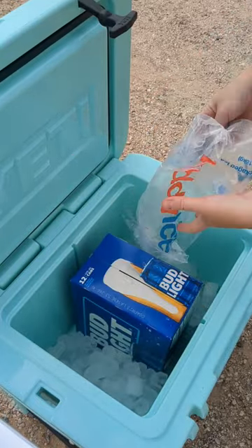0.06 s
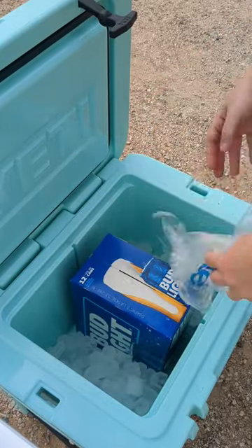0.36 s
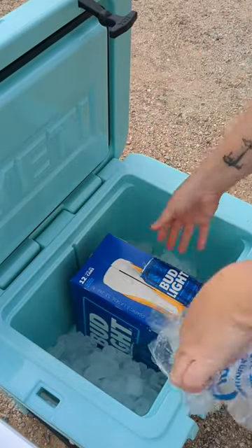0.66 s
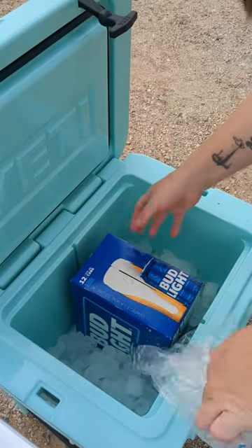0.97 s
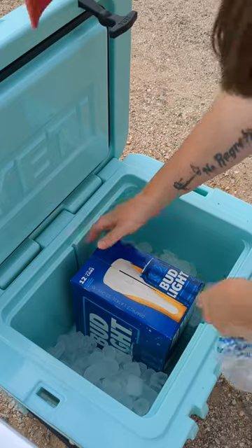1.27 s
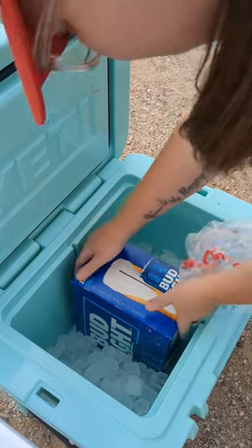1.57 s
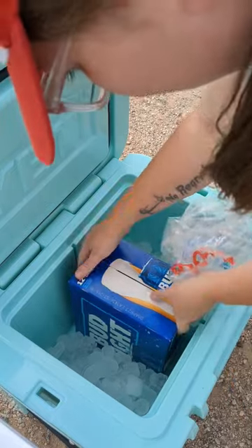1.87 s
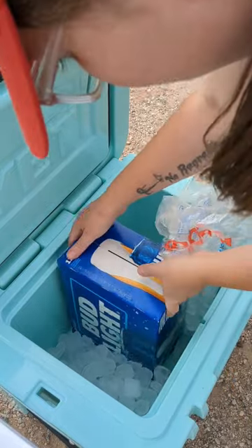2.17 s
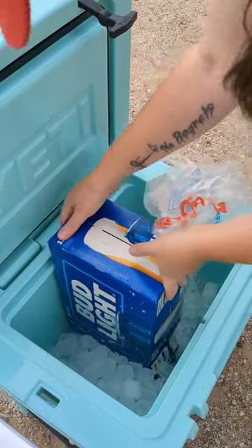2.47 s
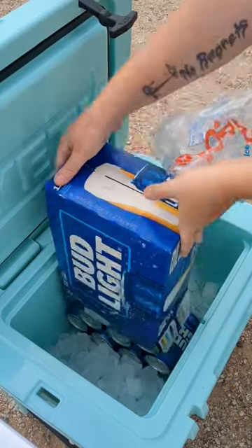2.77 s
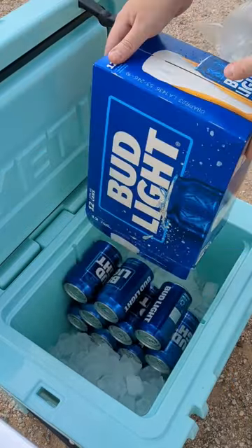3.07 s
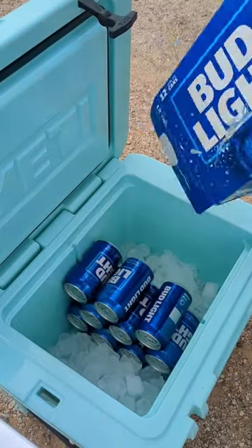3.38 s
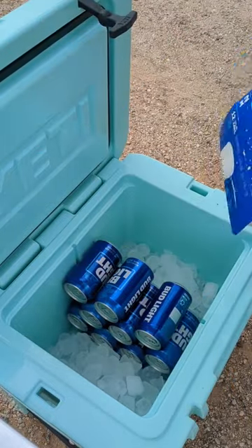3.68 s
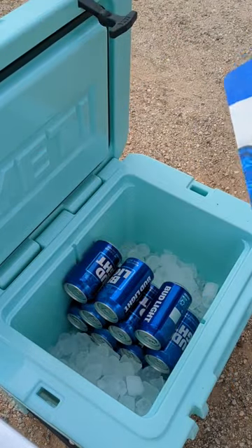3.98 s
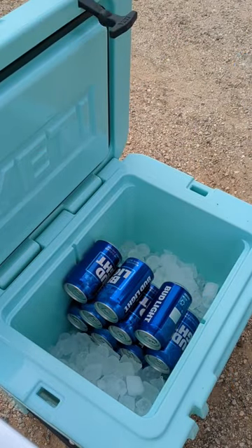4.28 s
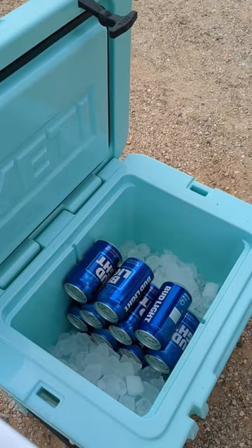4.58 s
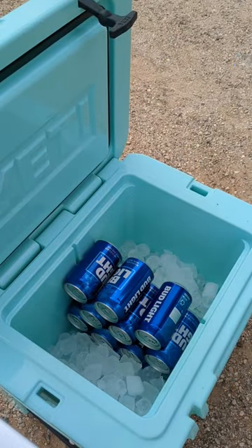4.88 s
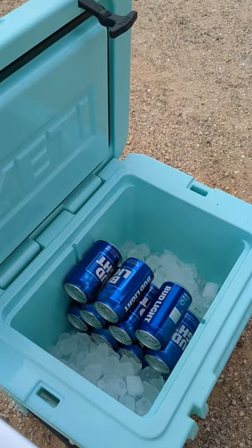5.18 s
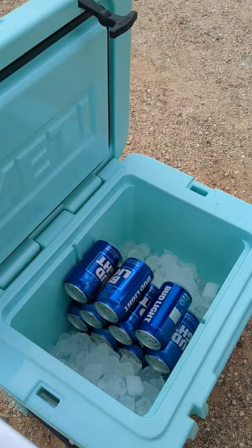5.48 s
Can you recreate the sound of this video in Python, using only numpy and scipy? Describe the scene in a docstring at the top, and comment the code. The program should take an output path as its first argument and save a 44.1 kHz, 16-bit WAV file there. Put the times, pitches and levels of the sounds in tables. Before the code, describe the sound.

A single ice cube clicks into a plastic cooler while a thin bag crackles nearby, then dies down. Next comes the loudest part: cans scrape out of a lifted carton and tumble onto crunching ice with hollow thuds. The bag and carton are carried away with light crinkles and gritty scuffs. The microphone is close, in a quiet outdoor spot where far-off machines faintly hum and whine.

```python
"""An emptied ice bag crinkles close to the microphone, outdoors over a hard plastic cooler,
its creases buckling in tiny clicks; one last cube drops in. A carton is lifted and its drink cans
slide out, rubbing the cardboard, knocking onto the ice and ringing the tub. Bag and carton are
carried off over gravel with a few scuffs, while faint machines hum and whine far away."""
import sys
import numpy as np
from scipy import signal
from scipy.fft import rfft, irfft
from scipy.io import wavfile

SR = 44100
rng = np.random.default_rng(int(sys.argv[2]) if len(sys.argv) > 2 else 0)


def store_pcm(level_fs):
    """Save levels as 16-bit WAV."""
    pcm = np.round(np.clip(level_fs, -1, 1) * 32767).astype(np.int16)
    wavfile.write(sys.argv[1], SR, np.atleast_2d(pcm).T)


N = 244314
TIME = np.arange(N) / SR
TOP_HZ = 15950

# bright fizz of thin film and ice chips: (frequency [Hz], relative level [dB])
FIZZ_SPECTRUM = [(1500, -41), (4000, -11), (6500, 2.5), (8000, 0), (10000, 4), (12500, 6), (14000, -5),
                 (16000, -5)]
# rustle of the bag's larger folds: (frequency [Hz], relative level [dB])
FOLD_SPECTRUM = [(100, -1), (380, 1.5), (600, -2.5), (950, -0.5), (1200, -4), (1900, -1), (3200, -3),
                 (5000, -6.5), (9000, -30)]
# grips on the bag: (start [s], length [s], fizz [dB], rustle [dB])
BAG_GRIPS = [(0, 0.18, -52.5, -51), (.135, 0.37, -48, -50), (.41, 0.04, -46.5, -46), (.49, .29, -54, -57),
             (.65, 0.064, -50, -61), (.8, 1, -59.5, -60), (1.02, 0.11, -51.5, -51),
             (1.275, 0.084, -49.5, -52), (1.41, 0.12, -60.5, -56), (1.63, 0.044, -62, -58),
             (3.08, 0.22, -73, -74.5), (3.145, 0.022, -63.5, -61.5), (3.32, 1.47, -67, -69.5),
             (3.402, 0.029, -53, -89), (3.49, .05, -63.5, -61), (3.6, 0.15, -71, -62),
             (3.635, 0.013, -54.5, -57.5), (3.795, 0.12, -59, -73), (3.91, 0.053, -57.5, -62),
             (4.02, .055, -53, -57.5), (4.1, 0.05, -56.5, -58.5), (4.39, 0.12, -58.5, -63.5),
             (4.63, 0.033, -62.5, -81), (4.83, 0.062, -64, -61), (4.92, .15, -66.5, -64.5),
             (5.325, 0.053, -70, -63.5), (5.39, 0.18, -72.5, -69)]
# the loudest snaps of film and ice: (time [s], level [dB], lower crack relative to that [dB])
LOUD_SNAPS = [(0.7427, -39, -1), (0.9335, -44.5, -24), (1.0306, -46, -11), (1.5708, -46, -5),
              (1.7578, -43, -3), (1.8104, -49, 3), (1.932, -49, 2), (2.376, -27, 6.5), (2.4012, -30, 2.5),
              (2.435, -28, 6), (2.5206, -33, -4), (2.622, -31, 8), (2.6648, -36.5, -1.5),
              (2.7143, -41.5, 10), (2.7457, -39.5, 11), (2.9265, -29, -8), (2.9817, -37.5, -11),
              (3.0724, -42, 5), (3.2158, -54.5, -7.5), (3.324, -51, -10), (4.0505, -41, -4.5),
              (4.2197, -50.5, -6), (4.352, -49, -6), (4.4525, -46.5, 1.5), (4.783, -52, -13),
              (4.9676, -55, -6), (5.1088, -58.5, -10)]
# cans and carton landing: (time [s], level [dB], pitch [Hz])
LANDINGS = [(2.2405, -1, 503), (2.246, -13.5, 240), (2.2617, -0.5, 554), (2.269, -9, 280),
            (2.374, -7.5, 460), (2.387, -5, 657), (2.4045, -3.5, 810), (2.427, -14.5, 278),
            (2.44, -11, 210), (2.847, 0, 377), (2.8549, -5, 390), (2.8628, -0.5, 316), (2.8782, -1.5, 388),
            (2.888, -7.5, 210), (2.875, -15.5, 150), (2.972, -17.5, 171), (2.969, -7.5, 426)]
# cubes and cans striking together: (time [s], level [dB], pitch [Hz], t60 [s])
ICE_CLACKS = [(0.0881, -12.5, 1890, 0.0062), (2.128, -19, 2200, 0.0043), (2.4014, -21.5, 2010, 0.026),
              (2.434, -22, 2630, 0.015), (2.5384, -18.5, 2710, 0.003), (2.8471, -20.5, 1800, 0.019),
              (2.8917, -18.5, 1870, 0.0056), (2.9627, -21.5, 1410, 0.01), (3.0721, -39, 2720, 0.013)]
# cans rubbing on cardboard: (frequency [Hz], relative level [dB])
RUB_SPECTRUM = [(300, -6.5), (900, -2.5), (1300, -1.5), (2000, -0.5), (2800, -2), (3800, -8), (5000, -13.5),
                (9000, -28.5)]
# the carton's drumming panels: (frequency [Hz], relative level [dB])
PANEL_SPECTRUM = [(60, -62.5), (130, -18.5), (220, -3.5), (400, -0.5), (520, -1), (680, -3.5), (850, -4.5),
                  (1200, -14), (2500, -53)]
# steady drag of the carton lifted off the cans: (time [s], level [dB])
CARTON_DRAG = [(1.799, -62.5), (1.95, -50), (2.05, -49.5), (2.19, -34.5), (2.32, -37.5), (2.5, -44),
               (2.78, -45.5), (3.02, -50), (3.112, -80)]
# cans breaking loose: (start [s], length [s], rub [dB], panel drumming [dB], ice crunch [dB])
CAN_TUMBLES = [(2.106, .03, -41.5, -42, -59), (2.232, 0.04, -38, -29.5, -48.5),
               (2.346, .095, -32, -26.5, -44), (2.612, 0.0065, -36, -29, -48),
               (2.803, 0.091, -33, -27, -41), (2.958, 0.041, -45, -28, -66)]
# resonances of the open tub: (frequency [Hz], gain [dB], t60 [s])
TUB_MODES = [(148.6, -0.5, 1), (198.9, 4.5, 0.17), (271.5, -3.5, 0.26), (394, -0.5, 0.13),
             (638, -10.5, 0.1), (795, -5, 0.082), (955, -15.5, 0.077), (1276, -5, .14)]
# hands, shoes and carton scuffing: (time [s], level [dB], pitch [Hz], t60 [s])
SCUFF_STROKES = [(0, -25, 614, 0.036), (0.027, -40, 417, 0.22), (0.426, -46.5, 280, 0.17),
                 (1.955, -45, 5400, .09), (2.108, -26, 726, 0.2), (3.593, -44, 780, 0.065),
                 (3.743, -40.5, 420, 0.15), (4.256, -54, 540, 0.18), (4.449, -48, 1450, 0.12),
                 (4.609, -49, 805, 0.07), (4.89, -47.5, 1066, 0.16), (5.034, -45.5, 640, 0.18),
                 (5.35, -53, 794, 0.23)]
# thin tones as the carton is carried off: (start [s], length [s], pitch [Hz], level [dB])
FAINT_TONES = [(3.105, 1, 251.6, -61), (3.548, 0.41, 4440, -70), (3.55, 0.95, 2345, -69)]
# a far machine humming: (time [s], level [dB])
MACHINE_HUM = [(0, -53), (1.0, -63.5), (2.0, -54), (3.2, -67.5), (4.2, -63), (5.54, -65)]
# a far motor gathering speed: (time [s], pitch [Hz], level [dB])
MOTOR_WHINE = [(3.602, 698, -78), (4.398, 705, -71.5), (4.9, 731, -65), (5.2, 717.5, -67),
               (5.54, 722, -68.5)]
# the low noise of the open air: (frequency [Hz], relative level [dB])
AIR_SPECTRUM = [(20, -26.5), (35, -13), (55, 5), (85, 1.5), (125, 3.5), (180, -10), (260, -11.5), (380, -5),
                (550, -11), (800, -19), (1100, -25), (3000, -34.5), (6000, -38), (15000, -65)]


def bag(strays_per_s=7):
    """Close up, creases buckle: small ones fizz, a few crackle or snap, larger folds rustle."""
    fizz_gain, folds_gain = np.sqrt(burst_power(BAG_GRIPS, attack_s=0.0095, release_t60=0.097))
    creases = grains(per_s=16000, spread_db=1.5, clump_db=3, clump_hz=147)
    crackle = amp(-5) * pings(per_s=420, low_hz=1202, high_hz=14600, cycles=35, spread_db=2.5)
    folds = grains(per_s=6600, spread_db=4, clump_db=2, clump_hz=95.3)
    stray_times = TIME[rng.random(N) < strays_per_s / SR]
    strays = snaps([(start, 9, -11) for start in stray_times])  # 9 dB over the fizz
    fizz = colour((creases + crackle) * fizz_gain, FIZZ_SPECTRUM) + strays * fizz_gain
    rustle = colour((folds + crackle * amp(-3)) * folds_gain, FOLD_SPECTRUM)
    return fizz + rustle


def snaps(rows, t60=0.022):
    """A crease or a cube gives way in a short bright spray with a lower crack."""
    top_gain, crack_gain, t = np.zeros(N), np.zeros(N), TIME[:SR // 20]
    for start, db, crack_db in rows:
        add(top_gain, start, amp(db) * decay(t, t60))
        add(crack_gain, start, amp(db + crack_db) * decay(t, t60))
    spray = rng.standard_normal(N)
    return colour(spray * top_gain, FIZZ_SPECTRUM) + colour(spray * crack_gain, FOLD_SPECTRUM)


def can_knocks(rise_s=0.00053, ring_cycles=6.4):
    """A full can lands with a heavily damped thud; so small a body radiates little bass."""
    thuds, t = np.zeros(N), TIME[:SR // 8]
    for start, db, hz in LANDINGS:
        envelope = (1 - np.exp(-t / rise_s)) * decay(t, ring_cycles / hz)
        add(thuds, start, amp(db) * envelope * np.sin(2 * np.pi * hz * t))
    return tub_echoes(low_cut(thuds, hz=190), wet_db=-12, t60=0.04)


def ice_clacks(rise_s=0.00077, chirp_s=0.0005):
    """A hard contact cracks, swells for a millisecond and rings briefly, starting sharp in pitch."""
    clacks, t = np.zeros(N), TIME[:SR // 16]
    for start, db, hz, t60 in ICE_CLACKS:
        tone = sine(hz * (1 + 0.5 * np.exp(-t / chirp_s)))
        envelope = (1 - np.exp(-(t / rise_s) ** 2)) * decay(t, t60)
        crack = amp(-17) * colour(rng.choice([-1, 1], len(t)) * decay(t, t60=0.03), RUB_SPECTRUM)
        add(clacks, start, amp(db) * (envelope / envelope.max() * tone + crack))
    return tub_echoes(clacks, wet_db=-3, t60=0.032)


def can_slide():
    """Cans stick and slip along the cardboard, drum on its panels and grind into clattering ice."""
    drag = fader(*np.transpose(CARTON_DRAG)) * amp([0, 6, -8])[:, None]  # rub, drum, crunch
    tumble_power = burst_power(CAN_TUMBLES, attack_s=0.0033, release_t60=0.17)
    rub_gain, drum_gain, crunch_gain = np.sqrt(drag ** 2 + tumble_power)
    slips = grains(per_s=5000, spread_db=4, clump_db=0.5, clump_hz=118)
    clatter = amp(-11) * pings(per_s=500, low_hz=726, high_hz=5850, cycles=34, spread_db=7.5)
    bumps = grains(per_s=2000, spread_db=3.5, clump_db=2.5, clump_hz=65.6)
    chips = grains(per_s=7100, spread_db=4.5, clump_db=3, clump_hz=145)
    rub = colour((slips + clatter) * rub_gain, RUB_SPECTRUM)
    drum = colour(bumps * drum_gain, PANEL_SPECTRUM)
    crunch = colour(chips * crunch_gain, FIZZ_SPECTRUM)
    return tub_echoes(rub + drum + crunch, wet_db=-8, t60=0.035)


def tub_echoes(x, wet_db, t60, count=90, dull_hz=3500):
    """Quick echoes between the walls and the lid; the ice scatters their treble away."""
    delays_s = 0.0015 + (np.arange(count) + rng.random(count)) / 2000
    taps = np.zeros(SR // 16)
    taps[(delays_s * SR).astype(int)] = rng.choice([-1, 1], count) * decay(delays_s, t60)
    dulled = signal.lfilter(*signal.butter(2, dull_hz, fs=SR), taps / np.linalg.norm(taps))
    return x + amp(wet_db) * signal.oaconvolve(x, dulled)[:N]


def tub_ring(x):
    """The tub and the air in it ring on after every blow."""
    ring, t = 0, TIME[:SR // 2]
    for hz, db, t60 in TUB_MODES:
        envelope = decay(t, t60)
        ring += amp(db) * 2 * np.cos(2 * np.pi * hz * t) * envelope / envelope.sum()
    return x + signal.oaconvolve(x, ring)[:N]


def scuffs(rise_s=0.0025):
    """Hands, shoes and carton make short gritty rubs, each around one broad resonance."""
    out, t = np.zeros(N), TIME[:SR // 3]
    grit = grains(per_s=4000, spread_db=2.5, clump_db=1.5, clump_hz=100)
    for start, db, hz, t60 in SCUFF_STROKES:
        band = signal.iirpeak(hz, Q=0.9, fs=SR)
        stroke = np.roll(grit, -round(start * SR))[:len(t)]
        rub = unit_rms(signal.lfilter(*band, signal.lfilter(*band, stroke)))
        add(out, start, amp(db) * rub * (1 - np.exp(-t / rise_s)) * decay(t, t60))
    return out


def faint_tones():
    """Narrow wavering tones swell and fade in the background."""
    out = np.zeros(N)
    for start, length, hz, db in FAINT_TONES:
        swell = np.sin(np.pi * np.clip((TIME - start) / length, 0, 1))
        out += amp(db) * swell * sine(hz * (1 + 0.028 * drift(88)))
    return out


def far_machines(hum_hz=147, upper_ratio=1.095):
    """Far from the microphone, one machine hums unsteadily and a motor whines on two tones."""
    hum_gain = fader(*np.transpose(MACHINE_HUM)) * amp(1.5 * drift(8.3))
    hum = hum_gain * sine(hum_hz + 4 * drift(14.7))
    times, hz, db = np.transpose(MOTOR_WHINE)
    whine_hz = np.interp(TIME, times, hz) + 13 * drift(38.2)
    return hum + fader(times, db) * (sine(whine_hz) + sine(upper_ratio * whine_hz))


def open_air():
    """The bed of the place: low outdoor noise, gently rising and falling."""
    return amp(-58.5) * colour(rng.standard_normal(N), AIR_SPECTRUM) * amp(1.9 * drift(2.4))


def grains(per_s, spread_db, clump_db, clump_hz):
    """Tiny clicks of uneven size that come in clumps, at unit RMS."""
    sizes = amp(spread_db * np.minimum(rng.exponential(1, N), 3))
    clicks = rng.choice([-1, 1], N) * sizes * (rng.random(N) < per_s / SR)
    clumping = amp(2 * clump_db * np.tanh(drift(clump_hz) / 2))
    return unit_rms(clicks * clumping)


def pings(per_s, low_hz, high_hz, cycles, spread_db, candidates=6000):
    """Tiny contacts, each ringing briefly at its own pitch, at unit RMS."""
    out, t = np.zeros(N), TIME[:SR // 40]
    for when, pitch, size, side, chance in rng.random((candidates, 5)):
        if chance < per_s * TIME[-1] / candidates:
            hz = low_hz * (high_hz / low_hz) ** pitch
            ring = np.sin(2 * np.pi * hz * t) * decay(t, cycles / hz) * np.sqrt(hz / low_hz)
            strength = amp(spread_db * min(-np.log(size), 3))
            add(out, when * TIME[-1], np.sign(side - 0.5) * strength * ring)
    return unit_rms(out)


def burst_power(rows, attack_s, release_t60):
    """Bursts rise, hold and die away; gives one power curve per level column."""
    power = 0
    for start, length, *db in rows:
        rise = np.clip((TIME - start) / attack_s, 0, 1)
        release = decay(np.maximum(TIME - start - length, 0), release_t60)
        power += (amp(db)[:, None] * rise * release) ** 2
    return power


def colour(x, spectrum, size=4096):
    """Pass x through a minimum-phase filter of unit energy with the given spectrum."""
    hz, db = np.transpose(spectrum)
    bin_hz = abs(np.fft.fftfreq(size, 1 / SR)) + 1
    log_gain = np.log(amp(np.interp(np.log(bin_hz), np.log(hz), db)))
    response = np.exp(np.conj(signal.hilbert(log_gain)))
    taps = np.fft.ifft(response).real[:size // 2]
    return signal.oaconvolve(x, taps / np.linalg.norm(taps))[:len(x)]


def drift(hz):
    """A random wander of unit RMS, moving no faster than hz."""
    slow_bins = np.fft.rfftfreq(N, 1 / SR) < hz
    return unit_rms(irfft(rfft(rng.standard_normal(N)) * slow_bins, N))


def fader(times, db):
    """A gain that follows a dB curve and is silent outside it."""
    return amp(np.interp(TIME, times, db)) * (TIME >= times.min()) * (TIME <= times.max())


def low_cut(x, hz):
    return signal.sosfilt(signal.butter(2, hz, "highpass", fs=SR, output="sos"), x)


def sine(hz_curve):
    return np.sin(2 * np.pi * np.cumsum(hz_curve) / SR)


def decay(t, t60):
    return np.exp(-np.log(1000) * t / t60)


def amp(db):
    return 10 ** (np.asarray(db) / 20)


def unit_rms(x):
    return x / np.sqrt(np.mean(x ** 2) + 1e-20)


def add(mix, start_s, sound):
    part = mix[round(start_s * SR):][:len(sound)]
    part += sound[:len(part)]


def scene():
    """Beside the cooler: what happens inside the tub rings it; the rest sounds in the open air."""
    inside = tub_ring(can_slide() + can_knocks() + ice_clacks())
    handling = bag() + snaps(LOUD_SNAPS) + scuffs()
    background = faint_tones() + open_air() + far_machines()
    return (inside + handling + background)[None]


def record(dry):
    """One mono microphone, shedding the deep bass and the highest treble."""
    high_cut = signal.firwin(511, TOP_HZ, window=("kaiser", 9), fs=SR)
    return signal.oaconvolve(low_cut(dry, hz=44), high_cut[None], "same")


dry = scene()
out = record(dry)
store_pcm(out)
```